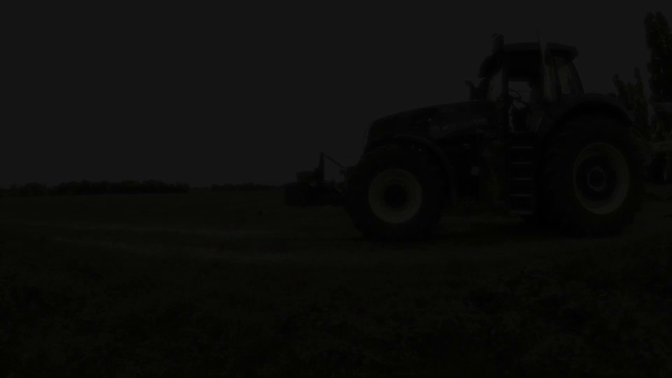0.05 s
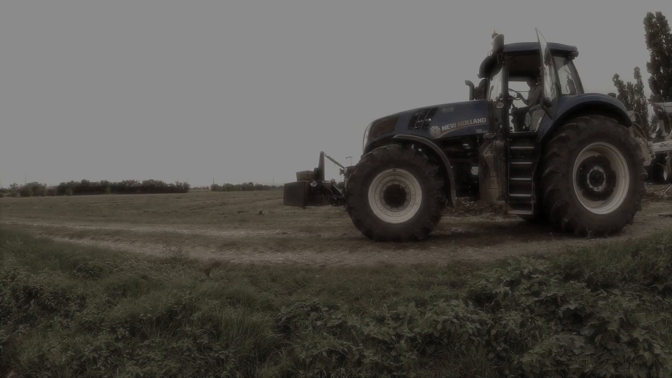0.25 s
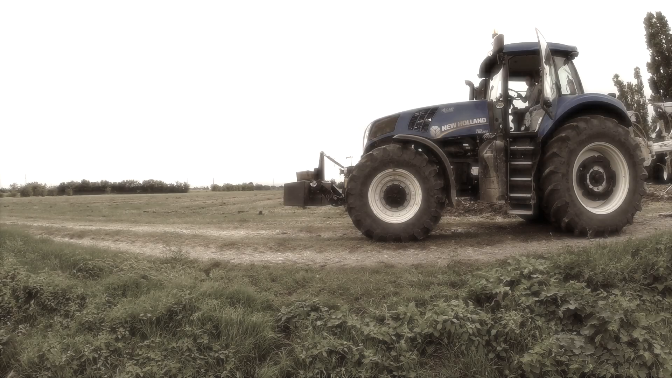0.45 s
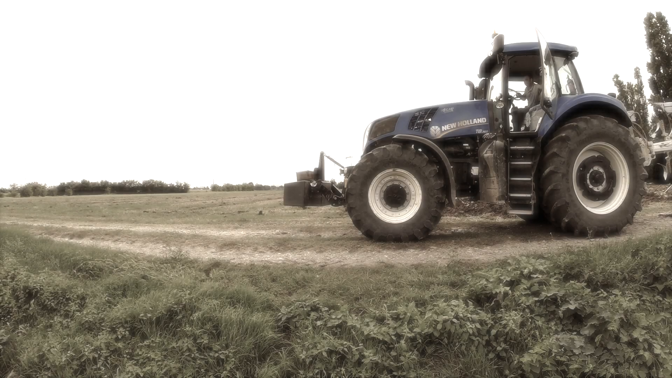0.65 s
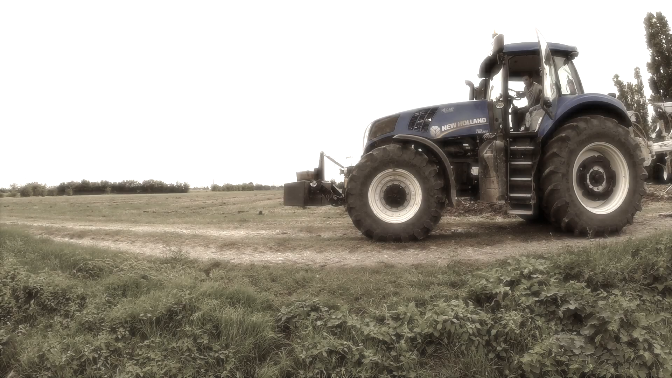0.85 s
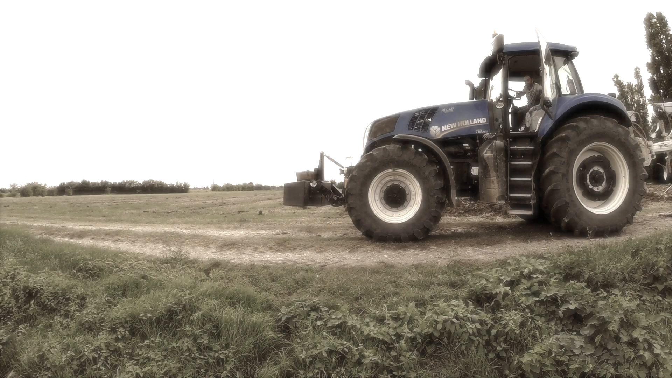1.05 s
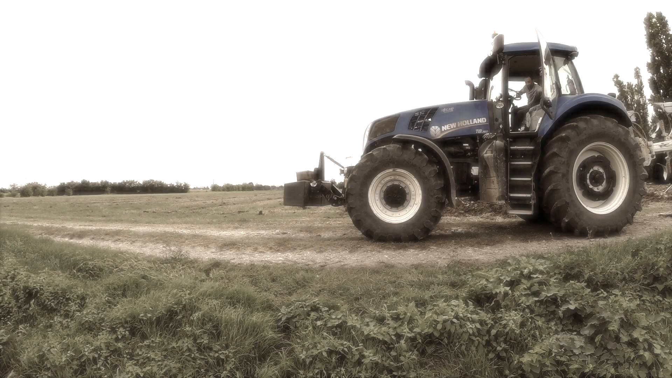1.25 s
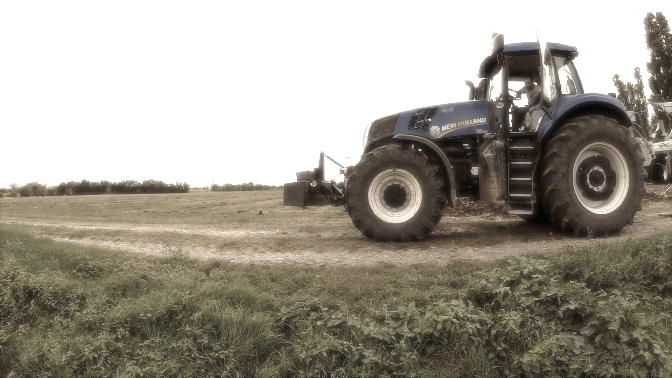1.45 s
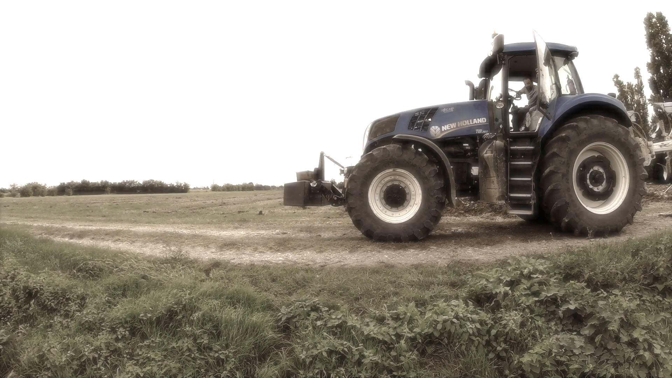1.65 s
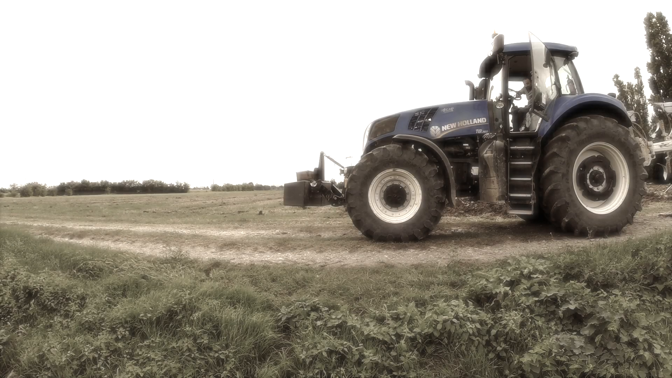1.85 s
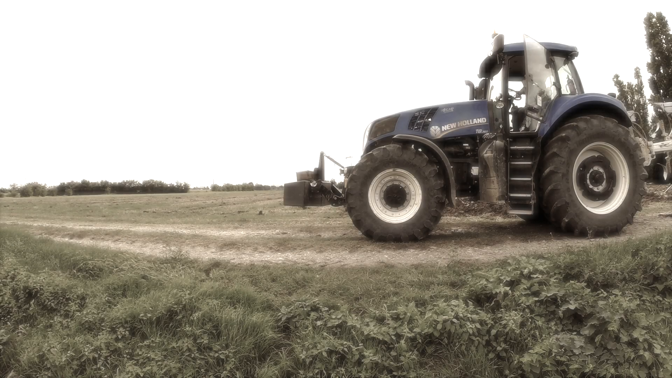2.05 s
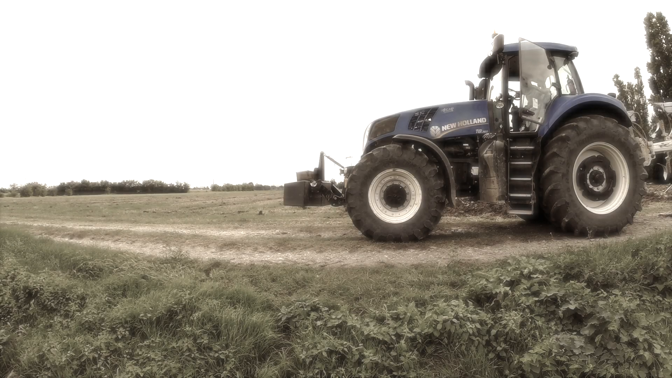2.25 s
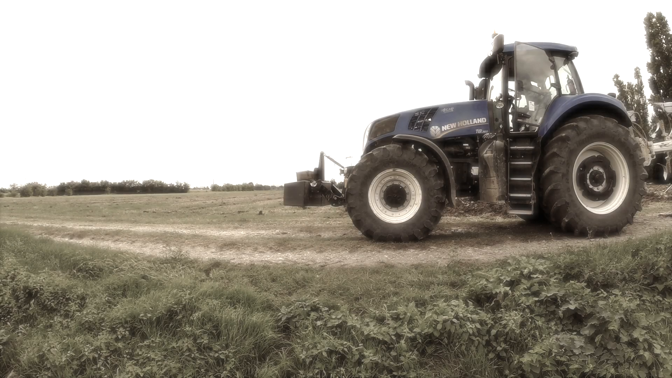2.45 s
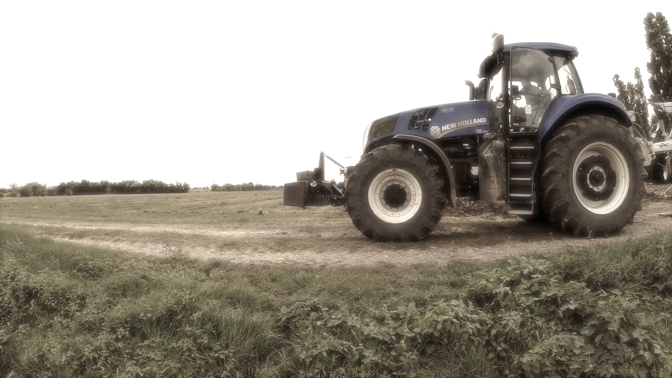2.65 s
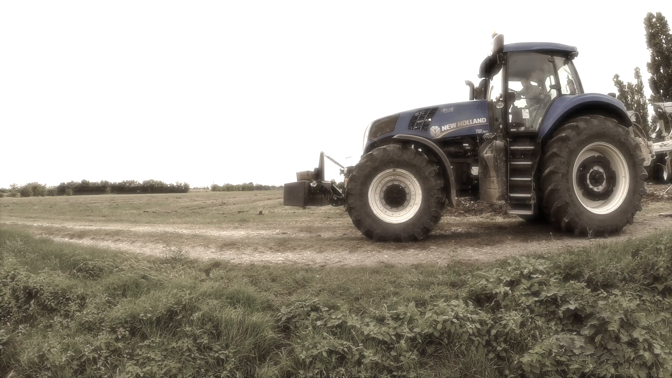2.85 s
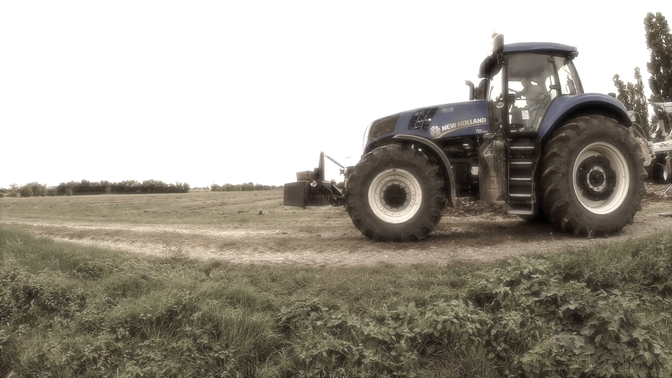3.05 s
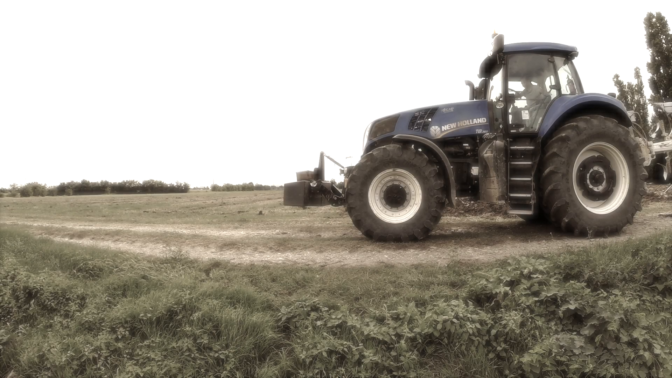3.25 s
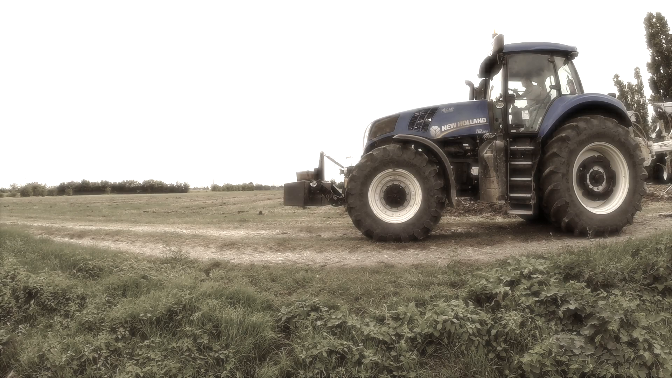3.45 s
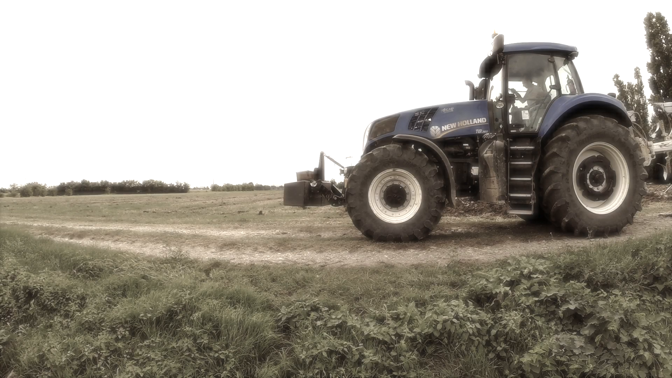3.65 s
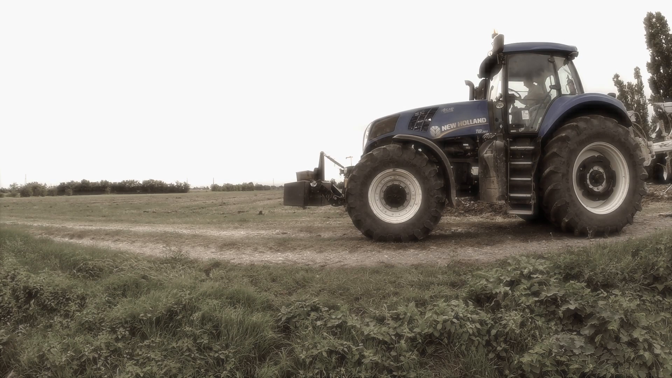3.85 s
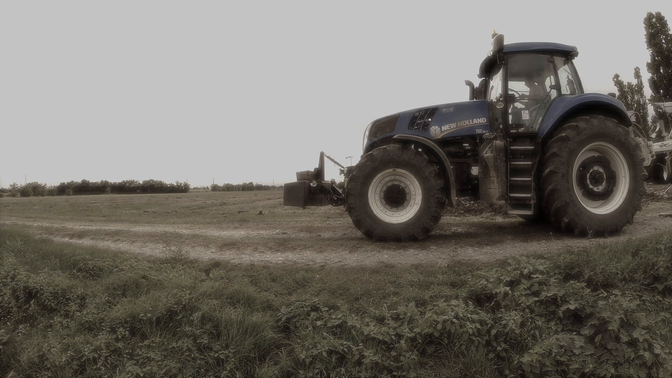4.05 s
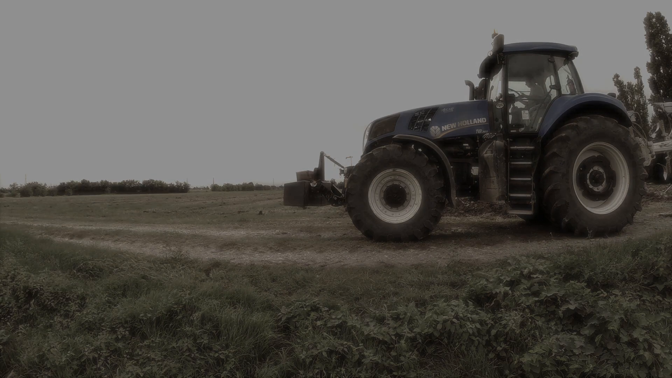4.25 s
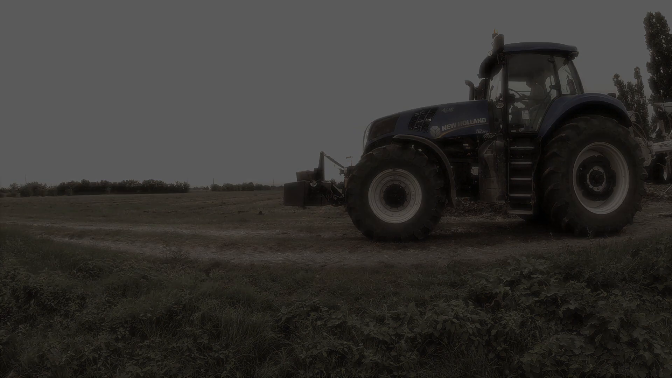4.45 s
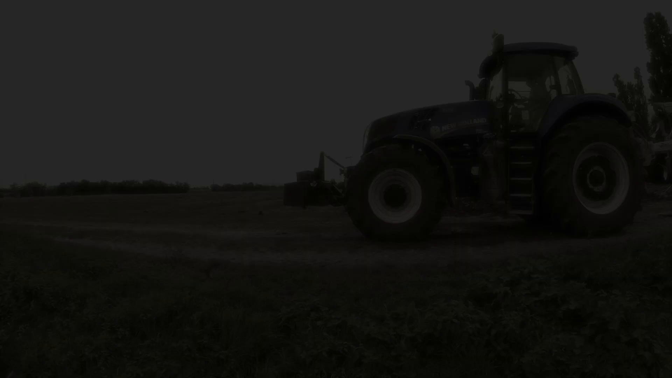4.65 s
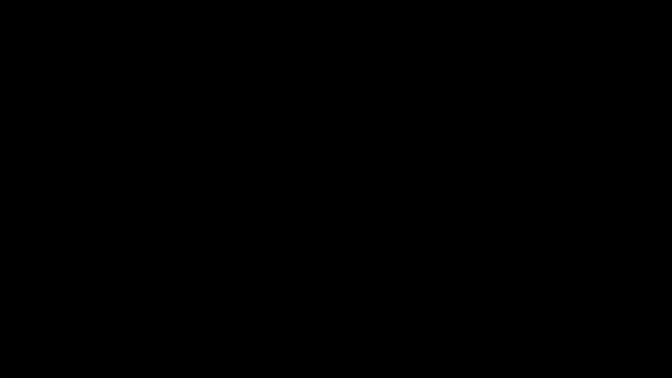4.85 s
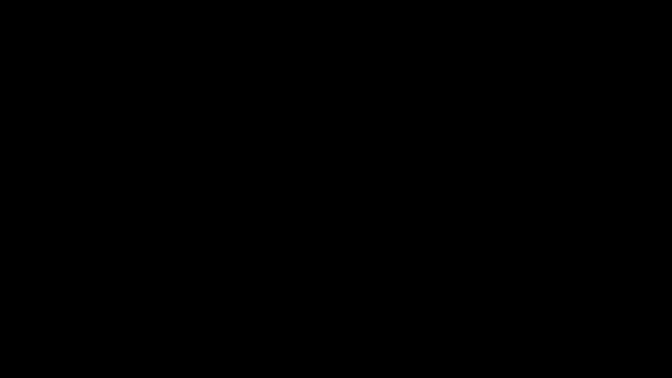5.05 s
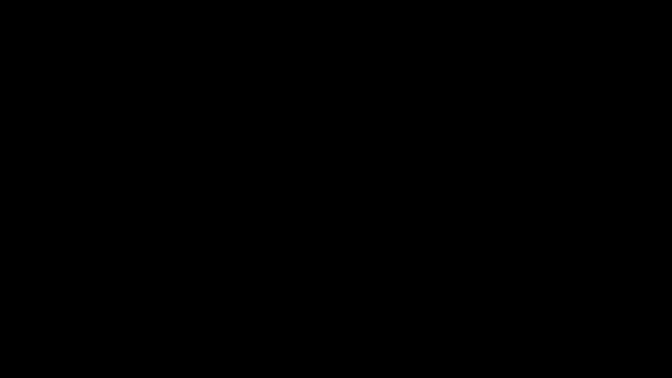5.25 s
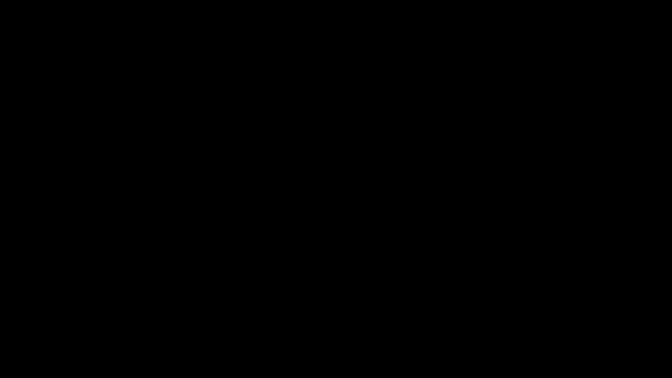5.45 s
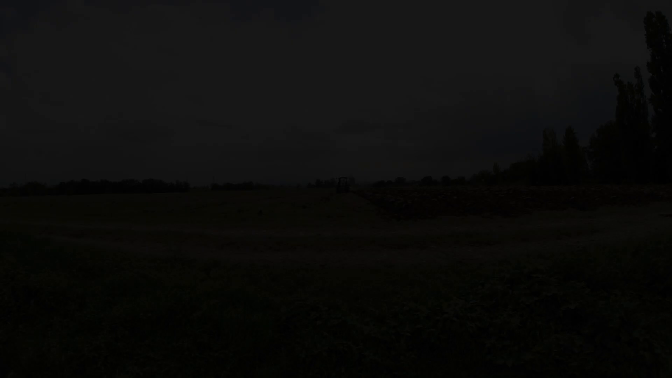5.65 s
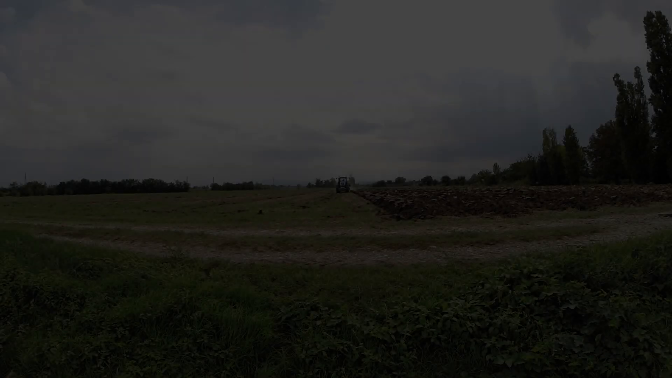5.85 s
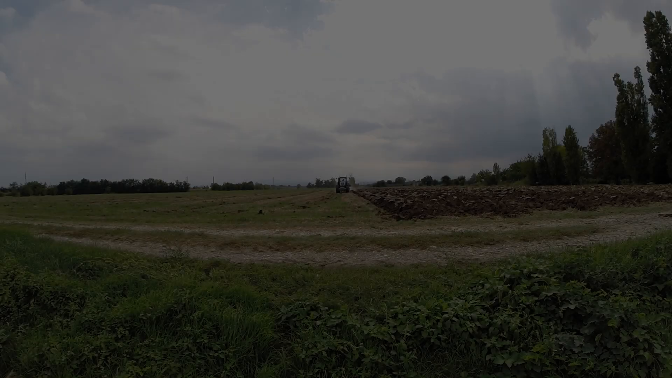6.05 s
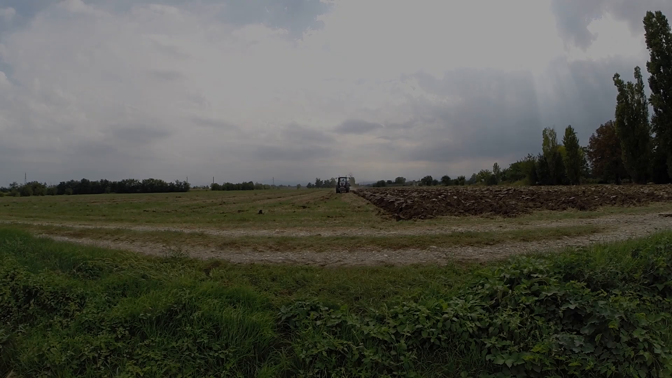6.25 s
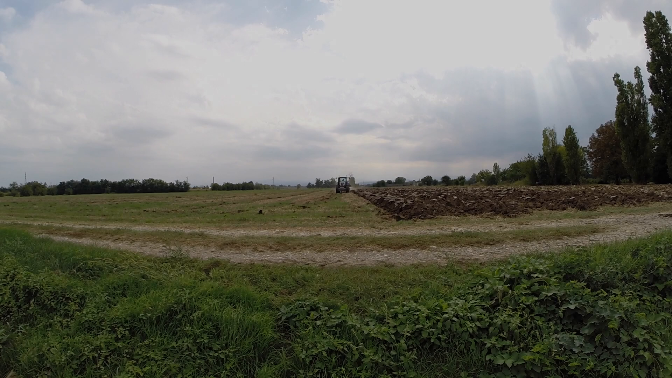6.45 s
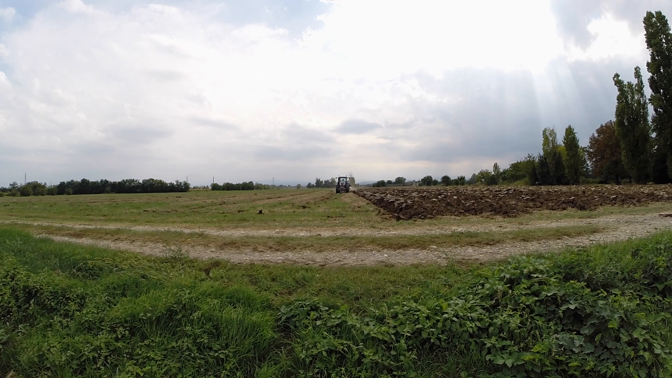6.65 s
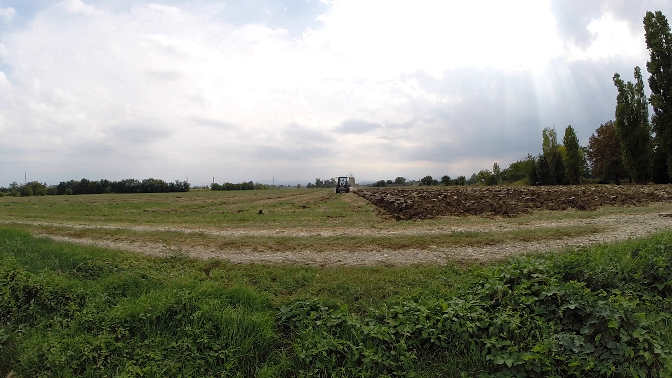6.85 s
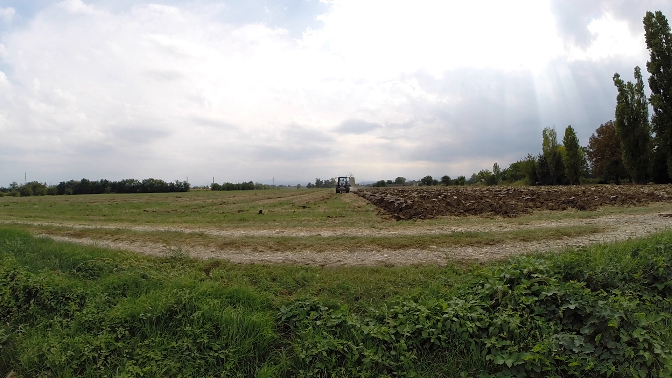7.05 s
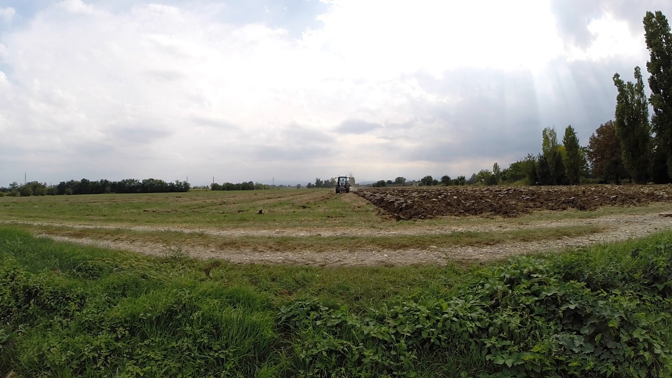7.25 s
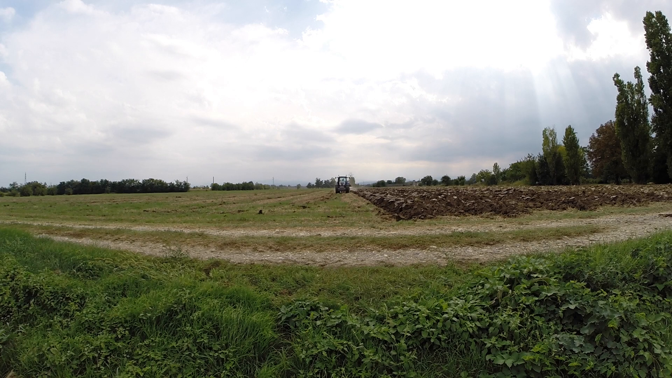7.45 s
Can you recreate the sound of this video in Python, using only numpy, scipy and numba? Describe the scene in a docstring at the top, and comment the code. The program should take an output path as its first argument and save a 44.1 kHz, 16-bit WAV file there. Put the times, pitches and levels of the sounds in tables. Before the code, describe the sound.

A big diesel tractor fades in over the first half second, running fast and steady a few metres away in an open field. Its exhaust roar and low hum dominate, with dense engine clatter, fine fuel pump ticking, gear whine and a humming fan. At about 3 seconds the cab door slams once, a sharp latch click with a short, low thump, while the engine carries on unchanged. From about 4.3 to 6.4 seconds the close engine fades away, dissolving into the much quieter drone and clatter of a tractor ploughing far off, with a faint hiss and a thin, very high turbo whistle. Soft puffs of wind rumble on the microphone between 5.6 and 6.1 seconds. From about 6.3 to 7.1 seconds the whistle dips, then the distant engine slows slightly and clatters a little more under load. One more faint wind puff comes around 7.5 seconds.

```python
"""A field: a big six-cylinder diesel tractor runs fast and steady a few metres away. Firing drives the
exhaust roar and block clatter; the fuel pump ticks, gears whine, fan blades hum. The cab door slams once.
The sound dissolves into the tractor ploughing far off, where turbo whistle and crank speed sag as the
load comes on. Puffs of wind rumble on the microphone."""
import sys
import numpy as np
from scipy import signal
from scipy.fft import rfft, irfft, next_fast_len
from scipy.io import wavfile
from scipy.ndimage import uniform_filter1d, map_coordinates
from numba import njit

SR = 44100
rng = np.random.default_rng(int(sys.argv[2]) if len(sys.argv) > 2 else 0)


def wav_record(signal):
    """Record a signal, one row per channel, as 16-bit PCM in the file named by sys.argv[1]."""
    frames = np.transpose(np.atleast_2d(signal))
    bounded = np.clip(frames, -1, 1)
    # unit amplitude maps onto the largest positive 16-bit level
    quanta = np.round(bounded * 32767).astype(np.int16)
    wavfile.write(sys.argv[1], SR, quanta)


N = 331191
TIME = np.arange(N) / SR
BAND_TOP_HZ = 10250


def near_tractor():
    """Exhaust, block, pump and gears follow the crank; the fan turns at its own speed."""
    # engine tones: crank_multiple, level_db
    engine_orders = [(1, -13), (2, -15.5), (2.5, -16), (3.5, -23.5), (8.5, -26), (16, -15.5)]
    # gear mesh tones: crank_multiple, level_db
    gear_orders = [(44, -19), (48, -12), (49.5, -21), (56, -19.5), (147, -28.5), (153, -34), (155, -33.5)]
    # fan tones: blade_rate_multiple, level_db
    fan_orders = [(1, -8), (2, -8.5), (3, -19), (5, -23.5)]
    # exhaust, block and pump spectra: freq_hz, level_db
    exhaust_spectrum = [(12, -29), (25, -8), (60, -6), (110, -1.5), (170, -5.5), (250, 2.5), (295, -1.5),
                        (340, -8), (410, -6), (560, -10.5), (680, -10), (880, -15), (1100, -28.5),
                        (2500, -52)]
    block_spectrum = [(400, -34), (1000, 0.5), (1500, -1.5), (2000, -5.5), (2400, -8.5), (3300, -12.5),
                      (4300, -18), (5000, -20.5), (6000, -25), (7200, -28.5), (10200, -35)]
    pump_spectrum = [(2500, -18), (4300, -7.5), (5000, -2), (6000, -14.5), (7700, -16), (10200, -18.5)]
    # their resonances: centre_hz, width_hz, lift_db
    exhaust_rings = [(283.6, 25, 3), (408, 22, 3.5), (520, 29, 2.5), (649, 30, 3), (885, 67, 5)]
    block_rings = [(1330, 38, 2.5), (2090, 83, 3.6), (3380, 35, 0.75)]
    pump_rings = [(4530, 140, 6), (4680, 160, 11), (5200, 120, 5), (5480, 290, 13.3), (6710, 250, 13),
                  (7060, 100, 6)]
    crank = turns(hz=30.425, wander=0.000788)
    # six cylinders overlap into a dense churn, with a slight lope once a turn
    lope_db = 0.37 * np.sin(2 * np.pi * crank)
    firing_db = 0.27 * np.sin(2 * np.pi * 3 * crank)
    churn = undb(lope_db + firing_db + 0.5 * walk(160))
    exhaust = undb(0.5) * colour(rattle(crank, repeat=0.12) * churn, exhaust_spectrum, exhaust_rings)
    hum = tones(crank, engine_orders, flutter_db=1.5)
    fan = tones(turns(hz=138.35, wander=0.0029), fan_orders, flutter_db=1.63)
    fan *= undb(-0.8 + 1.13 * walk(55))  # turbulent air roughens the blade tone
    block_gain = undb(0.5 * walk(20))
    block = block_gain * colour(rattle(crank, repeat=0.18) * churn, block_spectrum, block_rings)
    # four pump ticks a turn, swelling and sinking once per two turns
    ticks = strokes(4 * crank, decay_periods=0.44, scatter_db=1) * undb(2 * np.sin(np.pi * crank))
    pump = undb(-20) * colour(rattle(crank, repeat=0.35) * ticks, pump_spectrum, pump_rings)
    gears = tones(crank, gear_orders, flutter_db=2.5)
    return undb(-20) * (exhaust + hum + fan + undb(-10.5) * (block + pump + gears))


def cab_door():
    """The latch rattles home; the door thumps the cab air and its panels ring briefly."""
    # latch and frame contacts: start_s, level_db, decay_s
    contacts = [(2.999, -16.5, 0.0089), (3.007, -21, 0.0077), (3.0145, -20.5, 0.016), (3.025, -25, 0.0088)]
    # latch spectrum: freq_hz, level_db
    latch_spectrum = [(200, -3), (700, -7), (1400, 4.5), (2100, 1.5), (2800, -8.5), (4000, -5),
                      (6000, -15.5), (7700, -20), (9200, -19.5), (10200, -27.5)]
    # door meets its seal, then shuts home: start_s, push_gain
    blows = [(3.0024, -0.28), (3.0177, 0.89)]
    # cab air and door panel modes: pitch_hz, level_db, t60_s
    modes = [(28, -1.5, 0.28), (48, -13, .15), (80, -8, 0.11), (283, -8, 0.11)]
    envelope = sum(undb(db) * (TIME >= start_s) * np.exp(-np.abs(TIME - start_s) / decay_s)
                   for start_s, db, decay_s in contacts)
    slam = envelope * colour(noise() * undb(2 * walk(1500)), latch_spectrum)
    for start_s, push in blows:
        age_s = np.maximum(TIME - start_s, 0)
        for hz, db, t60_s in modes:
            slam += push * undb(db - 60 * age_s / t60_s) * np.sin(2 * np.pi * hz * age_s)
    return slam


def far_tractor():
    """The plough bites: the turbo slows first, then the crank sags and the clatter rises."""
    # firing drone: crank_multiple, level_db
    drone_orders = [(3, -7), (5, -17), (6, -8), (11, -17.5), (24, -25), (27, -25), (32, -26), (33, -23),
                    (48, -27.5)]
    # gear mesh tones: crank_multiple, level_db
    gear_orders = [(47, -24), (69, -29), (99, -30.5), (131, -36)]
    # steady driveline whines: pitch_hz, level_db
    driveline = [(4578, -38), (6099, -40)]
    # clatter and hiss spectra: freq_hz, level_db
    clatter_spectrum = [(20, -3), (80, -6.5), (130, -5), (180, 3.5), (240, -6), (400, -9.5), (520, -14),
                        (870, -10), (1200, -18), (1530, -17), (1800, -21.5), (3200, -21.5), (5700, -31.5),
                        (8500, -45)]
    hiss_spectrum = [(2000, -19), (5000, 2.5), (9000, -11), (11500, -7.5), (12800, -25), (15000, -28)]
    # clatter resonances: centre_hz, width_hz, lift_db
    clatter_rings = [(845, 72, 2.4), (1020, 79, 3), (1470, 230, 6.7), (2240, 280, 3.4), (3120, 190, 2.2),
                     (4260, 140, 2.8), (6960, 150, 4)]
    load_start_s, load_rise_s, turbo_lead_s = 6.62, 0.5, 0.33
    crank_hz, sag_hz, load_lift_db = 32.7, 1.0, 1.5
    load = ramp(load_start_s, load_rise_s)
    crank = turns(crank_hz - sag_hz * load, wander=0.00203)
    drone = tones(crank, drone_orders, flutter_db=1.5)
    fan = tones(turns(hz=210.5, wander=0.0014), [(1, -8.5)], flutter_db=0.5)
    throb = undb(0.8 * np.sin(2 * np.pi * crank) + 0.54 * walk(7.4))
    clatter = colour(rattle(crank, repeat=0.52) * throb, clatter_spectrum, clatter_rings)
    clatter = lowpass(undb(-2.5 + load_lift_db * load) * clatter, BAND_TOP_HZ)
    whines = sum(undb(db + 3 * walk(8)) * np.sin(2 * np.pi * turns(hz, wander=0.0005))
                 for hz, db in driveline)
    backlash_turns = 0.002 * walk(110)  # shakes the teeth, roughening their whine
    gears = tones(crank + backlash_turns, gear_orders, flutter_db=4)
    hiss = undb(-25.5) * colour(noise(), hiss_spectrum)
    whistle = turbo(ramp(load_start_s - turbo_lead_s, load_rise_s))
    return undb(-35.5) * (drone + fan + clatter + gears + whines + hiss + whistle)


def turbo(load):
    """Thin, jittery whistle that drops as the turbo loses speed under load."""
    pitch_hz, sag_hz, jitter_hz = 10930, 230, 125
    cycles = np.cumsum(pitch_hz - sag_hz * load + jitter_hz * walk(900)) / SR
    return undb(-29.5 + 2 * walk(45)) * np.sin(2 * np.pi * cycles)


def wind():
    """Soft puffs swell and sink, rumbling on the microphone."""
    # puffs: peak_s, level_db, half_length_s
    puffs = [(5.644, -26, 0.058), (5.797, -26, 0.022), (5.927, -28, 0.024), (6.1, -36, 0.082),
             (7.467, -36, 0.044)]
    # rumble spectrum: freq_hz, level_db
    spectrum = [(10, -29), (25, -3), (90, 7), (160, -6), (400, -44), (2000, -88)]
    pressure = sum(undb(db) * np.exp(-((TIME - peak_s) / half_s) ** 2) for peak_s, db, half_s in puffs)
    return pressure * colour(noise(), spectrum)


def turns(hz, wander):
    """Turns made by a shaft whose speed hunts a little."""
    return np.cumsum(hz * (1 + wander * walk(6))) / SR


def tones(shaft, orders, flutter_db):
    """Tones locked to a shaft, each fluttering in the moving air."""
    return np.sqrt(2) * sum(
        undb(db + flutter_db * walk(14)) * np.sin(2 * np.pi * (multiple * shaft + rng.random()))
        for multiple, db in orders)


def rattle(crank, repeat):
    """Impact noise; the share `repeat` of its power recurs each four-stroke cycle (two turns)."""
    cycle = rng.standard_normal(2880)
    recurring = map_coordinates(cycle, [crank / 2 % 1 * len(cycle)], order=3, mode="grid-wrap")
    return np.sqrt(repeat) * recurring + np.sqrt(1 - repeat) * noise()


def strokes(phase, decay_periods, scatter_db):
    """A burst of random strength on each wrap of the phase."""
    strength = undb(scatter_db * rng.standard_normal(int(phase[-1]) + 1))
    return unit(strength[phase.astype(int)] * np.exp(-(phase % 1) / decay_periods))


def colour(x, spectrum, rings=()):
    """Filter x by a spectrum with resonances on top; rms 1."""
    size = next_fast_len(N)
    hz, db = np.transpose(spectrum)
    bins_hz = np.maximum(np.arange(size // 2 + 1) * SR / size, 1)
    gain_db = np.interp(np.log(bins_hz), np.log(hz), db)
    for centre_hz, width_hz, lift_db in rings:
        gain_db += lift_db * np.exp(-2 * ((bins_hz - centre_hz) / width_hz) ** 2)
    return unit(irfft(rfft(x, size) * undb(gain_db), size)[:N])


def walk(rate_hz):
    """Smooth random drift, rms 1."""
    hold = max(int(SR / rate_hz), 2)
    steps = np.repeat(rng.standard_normal(N // hold + 1), hold)
    return unit(uniform_filter1d(uniform_filter1d(steps, hold), hold)[:N])


def lowpass(x, hz):
    """Steep low-pass."""
    return signal.sosfilt(signal.ellip(10, 0.2, 70, hz, fs=SR, output="sos"), x)


def ramp(start_s, length_s):
    """Linear rise from 0 to 1."""
    return np.clip((TIME - start_s) / length_s, 0, 1)


def noise():
    """White noise."""
    return rng.standard_normal(N)


def undb(db):
    """Decibels to gain."""
    return 10 ** (np.asarray(db) / 20)


def unit(x):
    """Scale to rms 1."""
    return x / np.sqrt(np.mean(x ** 2))


@njit
def follow(x, attack_s, release_s):
    """Envelope follower."""
    envelope, level = np.empty(len(x)), 0.
    for i in range(len(x)):
        level += (x[i] - level) / (SR * (attack_s if x[i] > level else release_s))
        envelope[i] = level
    return envelope


def scene():
    """The near tractor fades in, its door slams, then it dissolves into the far tractor and wind."""
    fade_in = ramp(start_s=0, length_s=0.5) ** 1.16
    dissolve = ramp(start_s=4.25, length_s=2.11)
    near = lowpass(near_tractor() + cab_door(), BAND_TOP_HZ) * fade_in
    return (near * (1 - dissolve) + far_tractor() * dissolve ** 1.66 + wind())[None]


def record(dry):
    """Automatic gain ducks just after an overload and creeps back; peaks clip; the top is cut."""
    threshold, lag_s = 0.5, 0.02
    overload = np.maximum(np.abs(dry[0]) - threshold, 0)
    held = follow(overload, attack_s=0.0035, release_s=0.28)
    duck_db = -9 * np.interp(TIME - lag_s, TIME, held)
    return lowpass(np.clip(dry * undb(duck_db), -1, 1), hz=15300)


dry = scene()
out = record(dry)
wav_record(out)
```